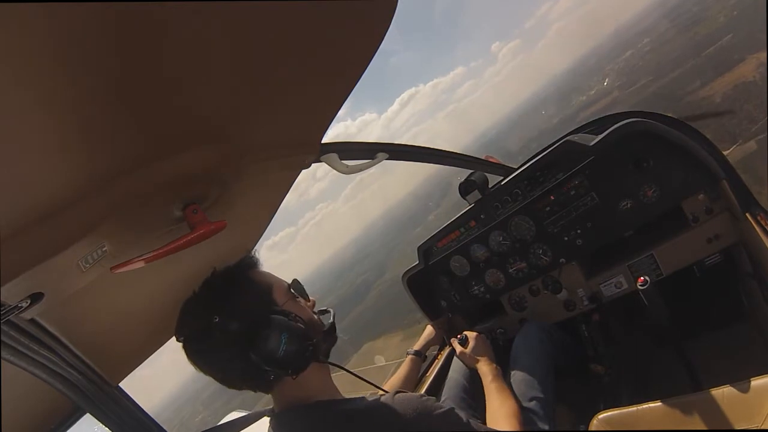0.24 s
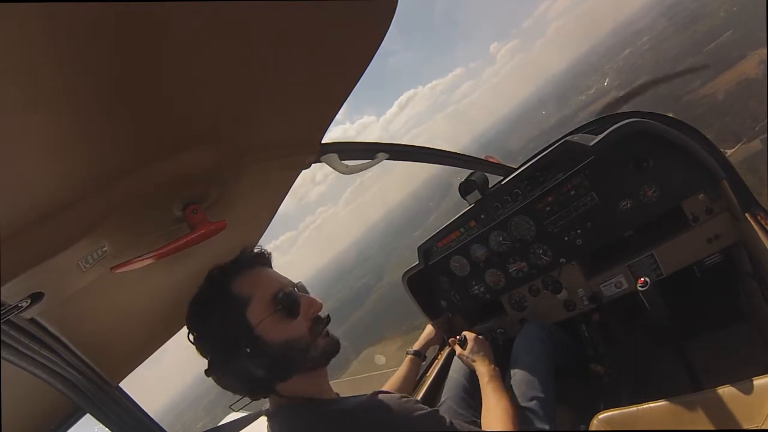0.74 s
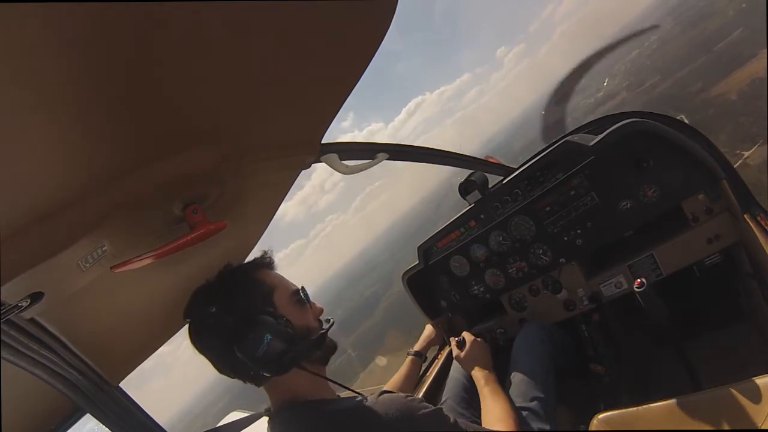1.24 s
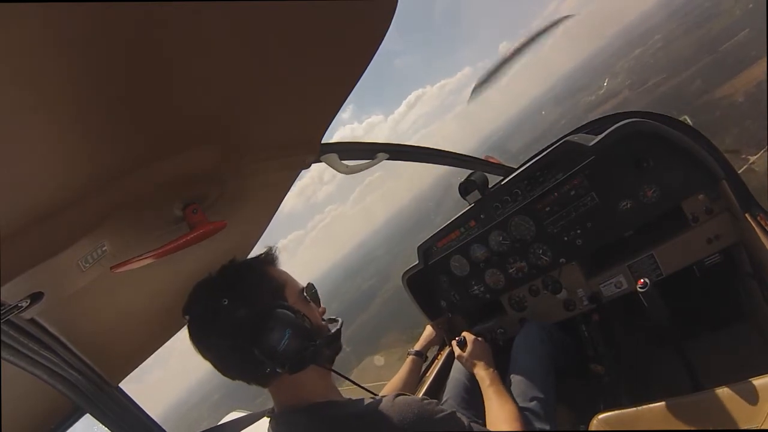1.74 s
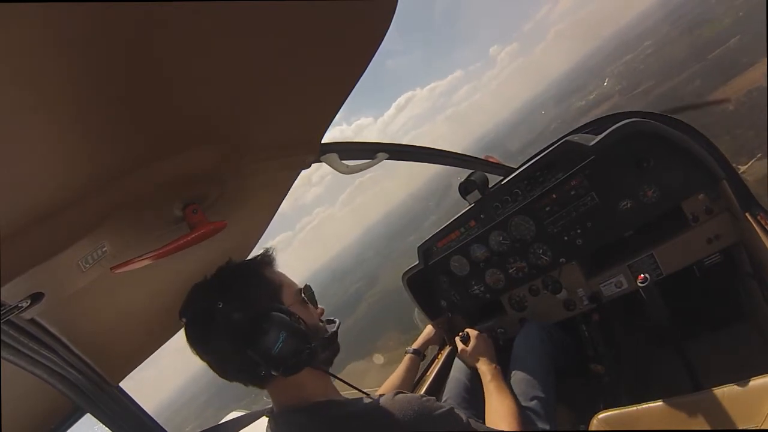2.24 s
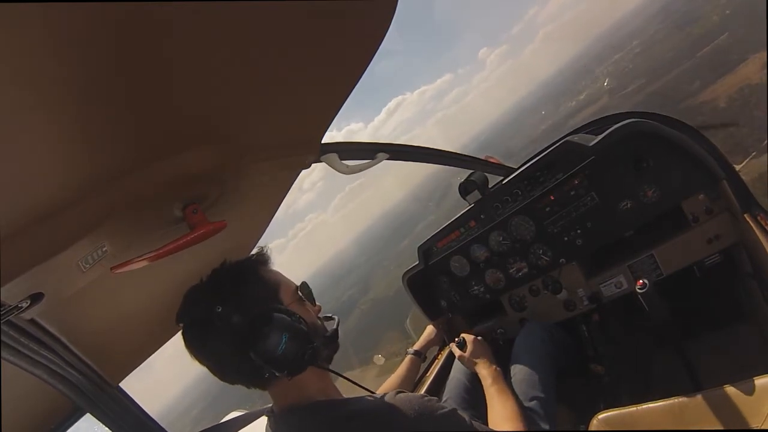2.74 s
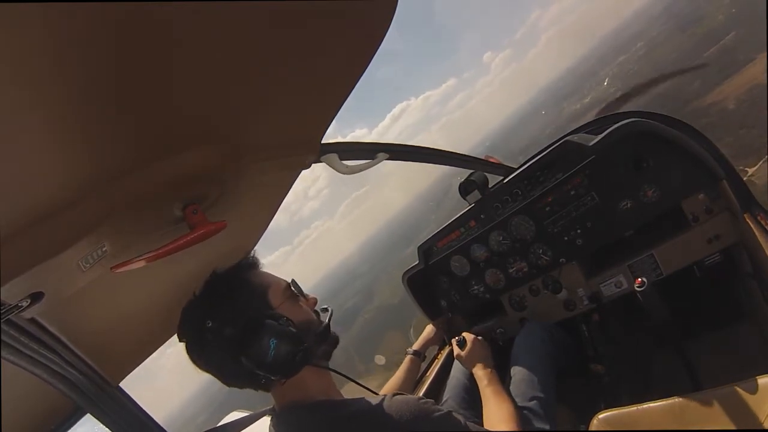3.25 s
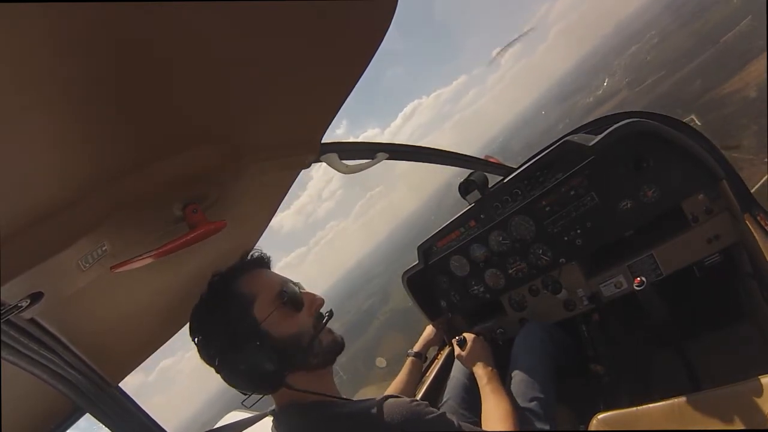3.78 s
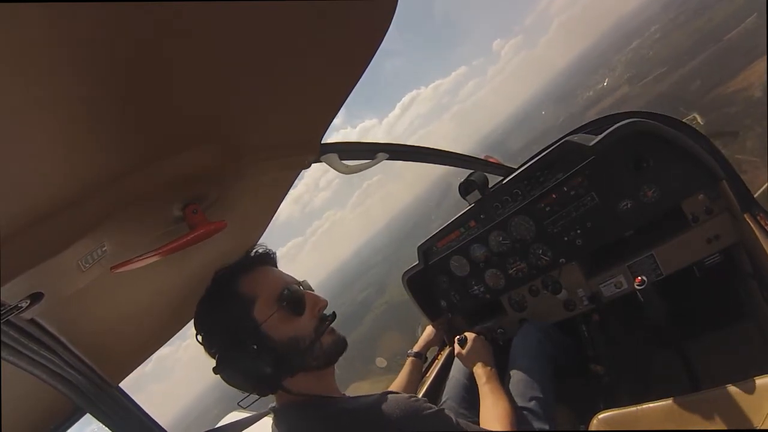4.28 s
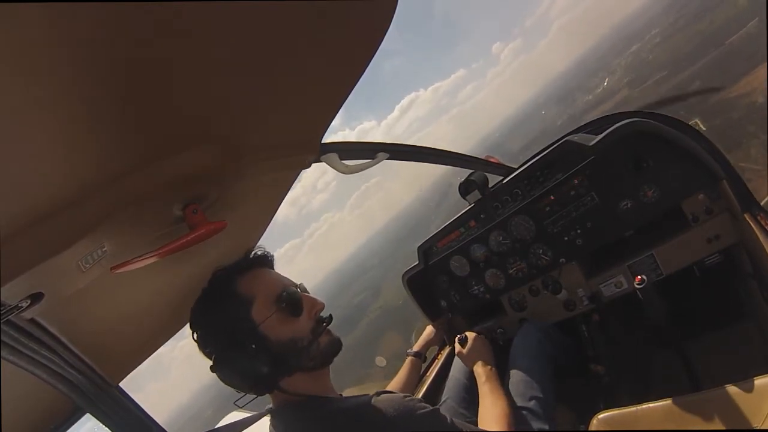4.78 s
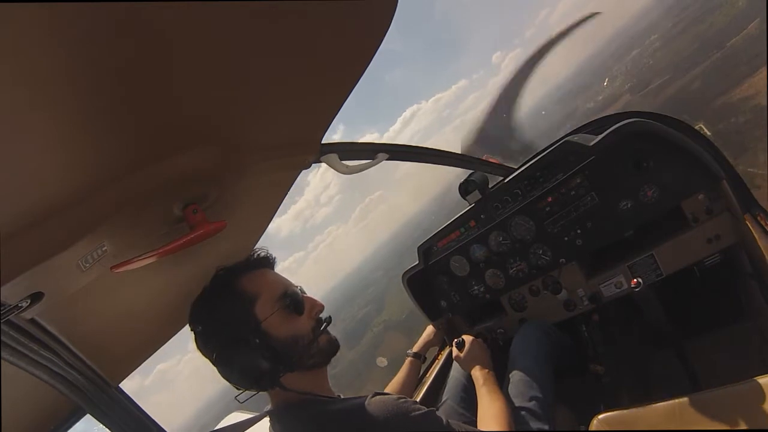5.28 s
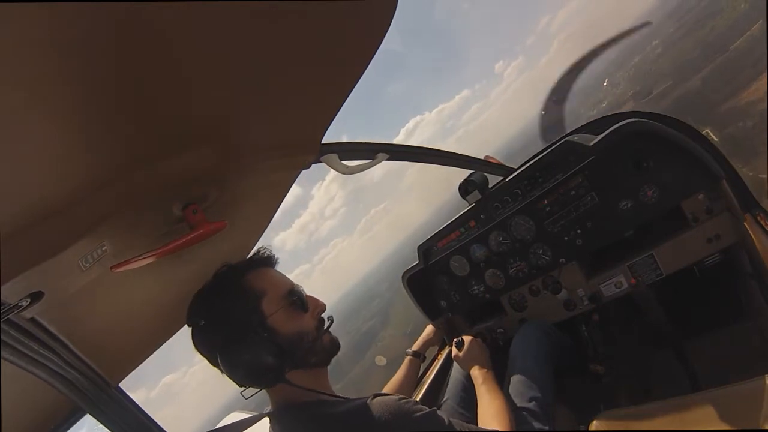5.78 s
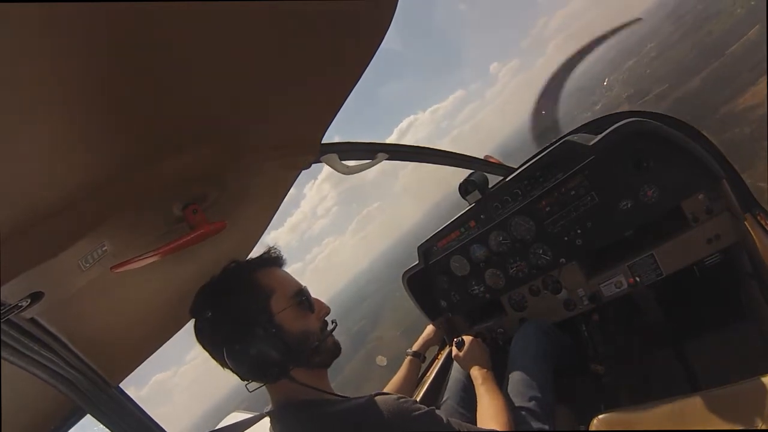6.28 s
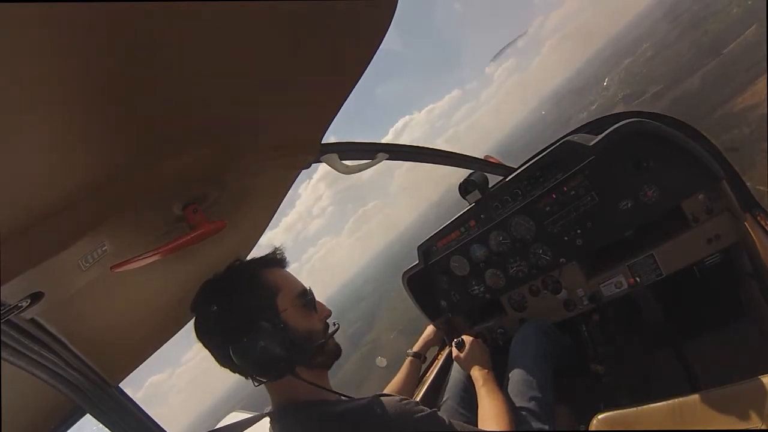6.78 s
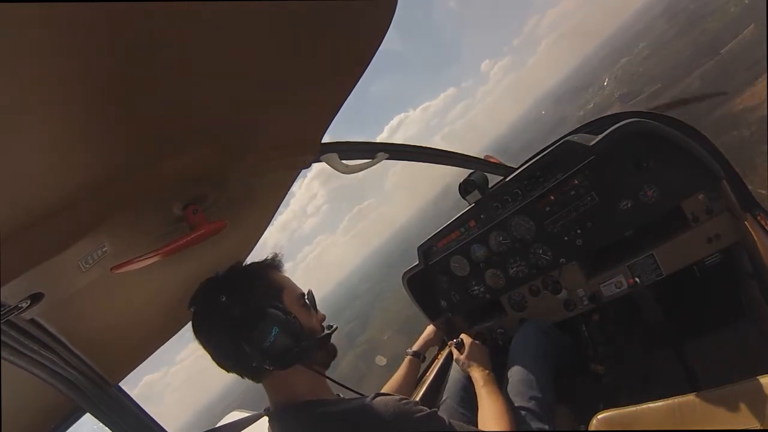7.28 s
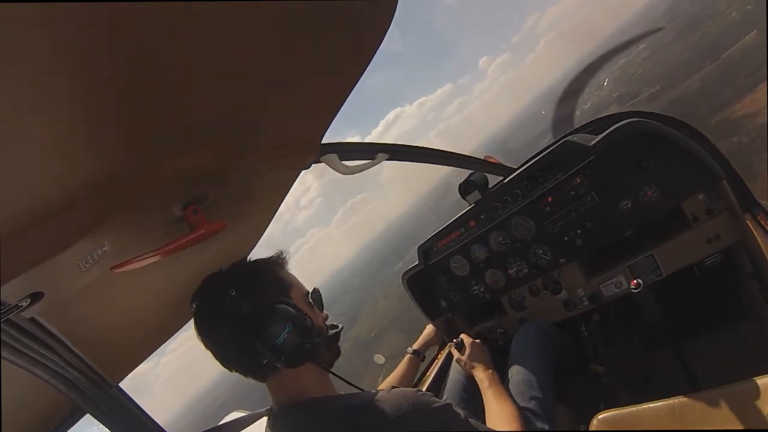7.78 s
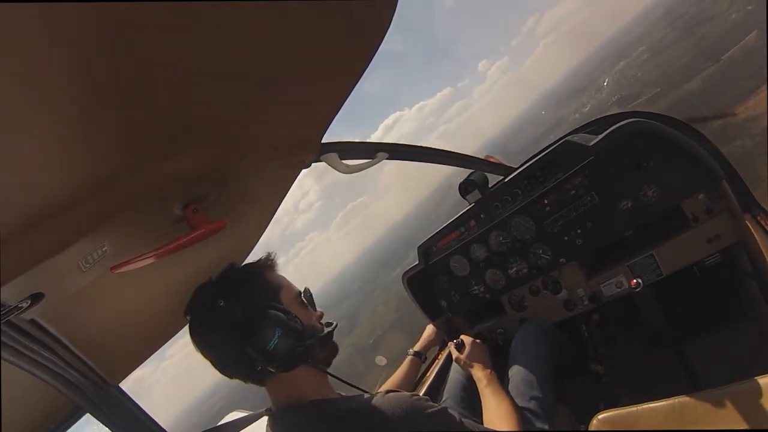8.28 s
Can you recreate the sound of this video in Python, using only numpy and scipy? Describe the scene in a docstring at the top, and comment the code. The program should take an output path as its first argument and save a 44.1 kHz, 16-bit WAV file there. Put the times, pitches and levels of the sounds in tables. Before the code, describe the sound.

Inside a light aircraft in flight, air throbs deeply and rushes over the canopy above a steady engine and propeller drone.

```python
"""A deep, uneven throb and a rush of air fill the cockpit of a light piston aircraft in a steady turn.
The throb is the slipstream (the air streaming past) beating on the cabin; the rush is air flowing over
the canopy (the clear roof). Engine and propeller drone on one pitch. Rough air makes the cabin rumble,
and gusts shake its panels and thump it. A loose fitting ticks in one gust; the electronics whine faintly.
"""
import sys
import numpy as np
from scipy import signal
from scipy.fft import rfft, irfft
from scipy.io import wavfile

SR = 44100
rng = np.random.default_rng(int(sys.argv[2]) if len(sys.argv) > 2 else 0)


def waveform_to_disk(signal):
    """Save audio, clipped to [-1, 1], as 16-bit WAV at the path in sys.argv[1]."""
    frames = np.transpose(np.atleast_2d(signal))
    scaled = np.clip(frames, -1, 1) * 32767
    samples = np.round(scaled).astype(np.int16)
    wavfile.write(sys.argv[1], SR, samples)


N = 376173
TIME = np.arange(N) / SR
FREQS_HZ = np.maximum(np.fft.rfftfreq(N, 1 / SR), 1)
BLADE_HZ = 100.71   # propeller blades passing per second

# The tones that shape one throb: multiple of the throb rate, relative level/dB
THROB_HARMONICS = [(1, 0), (2, -4), (3, -28), (4, -24.5)]
# Lulls, where the throb slows, weakens and stumbles: middle t/s, length/s, slowing/Hz
THROB_LULLS = [(0.02, 0.31, 4.2), (1.6, 0.38, 4.35), (3.25, .55, 4.6), (4.76, .3, 4.9), (5.38, 0.18, 2.5),
               (6.42, 0.335, 6.07), (7.1, .9, 2), (8.04, 0.46, 6)]
# How rough the air around the cabin is: t/s, relative level/dB
TURBULENCE_CURVE = [(0.0, -2), (0.3, -0.2), (1.0, 0), (1.7, -0.8), (2.3, 0.7), (2.9, 0.2), (3.95, -2.5),
                    (4.4, -1), (5.0, -1), (5.7, -0.1), (6.6, 0.0), (7.5, 1), (8.0, 0.4), (8.5, 1.5)]
# Gusts that shake the panels: middle t/s, length/s, rise/dB
PANEL_GUSTS = [(0.03, 0.63, 10), (2.24, 0.58, 5.5), (2.75, .16, 3.5)]
# The tone colour of air flowing over the canopy: f/Hz, relative level/dB
RUSH_SPECTRUM = [(400, -30.5), (750, -10.5), (950, -5.5), (1400, -2), (1900, 1), (2500, 0.5), (3000, -1.5),
                 (3600, -1.5), (4600, -6.5), (5300, -11), (7200, -18), (9000, -31.5), (12000, -45),
                 (15000, -65)]
# Cabin resonances (pitches it rings at) in the rush, plus two faint, steady engine gear whines
# at 2088 and 2330 Hz: f/Hz, width/Hz, boost/dB
RUSH_PEAKS = [(940, 40, 2.5), (1515, 55, 3.5), (1600, 30, 2), (2035, 50, 3), (2088, 12, 4), (2330, 18, 3.5),
              (2560, 45, 1.5), (2855, 40, 2), (4400, 200, 1), (4720, 70, 1.5)]
# The tone colour of the cabin's rumble: f/Hz, relative level/dB
RUMBLE_SPECTRUM = [(12, -19), (28, -6), (50, 10.5), (66, 8), (92, 2), (118, 3), (150, -0.5), (215, 1.5),
                   (260, -0.5), (310, -5), (360, -9), (400, -10.5), (440, -25.5), (600, -49)]
# The tones of engine and propeller: multiple of the blade rate, level/dB
DRONE_HARMONICS = [(1, -41), (2, -48), (5, -63), (6, -67.5), (7, -73), (8, -63.5)]
# Gusts hitting the airframe: t/s, strike level/dB
THUMP_HITS = [(.231, -22), (.347, -23), (.760, -28), (.946, -22), (1.831, -17), (2.675, -13), (2.762, -8.5),
              (4.808, -16), (5.118, -20), (6.622, -17), (7.562, -23), (8.385, -28), (8.505, -26)]
# The pitches at which the panels ring: f/Hz, width/Hz, relative level/dB
PANEL_RESONANCES = [(417, 92, -4), (520, 110, -2), (607, 32, -0.5), (695, 22, 1), (850, 180, -4.5)]
# Taps of the loose fitting: t/s, strike level/dB
FITTING_TAPS = [(2.676, -34), (2.684, -23), (2.7162, -9), (2.719, -23), (2.736, -13), (2.750, -20),
                (2.7565, -11), (2.768, -34), (2.786, -18)]
# Steady tones of the electronics: f/Hz, level/dB
WHINE_TONES = [(11408, -64.5), (12500, -72.5)]


def slipstream_throb(turbulence_db, even_hz=42.7, level_db=-27.0, jitter_hz=20):
    """Each swirl of air pulls one rounded dip in pressure; the slower they come, the more they stumble."""
    slowing_hz = swells(THROB_LULLS)
    rate_hz = even_hz - slowing_hz + 0.815 * drift(4)
    stumble = (0.032 + 0.0054 * slowing_hz) * drift(jitter_hz)
    cycles = np.cumsum(rate_hz) / SR + stumble
    dips = -sum(from_db(db) * np.cos(2 * np.pi * round(multiple) * cycles)
                for multiple, db in THROB_HARMONICS)
    throb_db = level_db + 0.94 * turbulence_db - 0.05 * slowing_hz + 0.7 * drift(jitter_hz)
    return np.sqrt(2) * from_db(throb_db) * dips


def canopy_rush(turbulence_db, swell_db=0.3, swell_hz=3.1):
    """Air rushes over the canopy. Its low part swells in gusts, and rougher air makes it hiss more."""
    boost_db = sum(db * hump(hz, width) for hz, width, db in RUSH_PEAKS)   # resonances and gear whines
    air = cabin_echoes(noise(from_db(spectrum_db(RUSH_SPECTRUM) + boost_db)))
    air = air * from_db(0.16 * drift(12))   # a slight flicker
    # Split the sound into four bands, from low to high, each with its own gain.
    low, up_to_mid, up_to_high = below(air, 1400), below(air, 3600), below(air, 8500)
    low_db = -31.0 + 0.17 * swells(PANEL_GUSTS) + swell_db * drift(swell_hz)
    mid_db = -31.5 - 0.12 * turbulence_db
    high_db = -31.5 + 0.23 * turbulence_db + swell_db * drift(swell_hz)
    hiss_db = -27.5 + 0.97 * turbulence_db
    return (from_db(low_db) * low
            + from_db(mid_db) * (up_to_mid - low)
            + from_db(high_db) * (up_to_high - up_to_mid)
            + from_db(hiss_db) * (air - up_to_high))


def cabin_rumble(turbulence_db, level_db=-33.5):
    """Rough air booms in the cabin as a deep noise."""
    return from_db(level_db + turbulence_db) * noise(from_db(spectrum_db(RUMBLE_SPECTRUM)))


def propeller_growl(turbulence_db, level_db=-37.5, wander_hz=48):
    """A strong tone at three times the blade rate slips ahead and behind so quickly that it growls."""
    cycles = 3 * BLADE_HZ * TIME + 0.15 * drift(wander_hz)
    tone = below(np.sin(2 * np.pi * cycles), 396, steepness=12)
    flutter_db = drift(wander_hz)
    return np.sqrt(2) * from_db(level_db + turbulence_db + flutter_db) * tone


def engine_drone(flutter_db=1.2, flutter_hz=5):
    """Engine and propeller make clean tones at multiples of the blade rate, fluttering in the rough air."""
    cycles = BLADE_HZ * TIME + 0.017 * drift(6.4)
    drone = np.zeros(N)
    for multiple, db in DRONE_HARMONICS:
        tone = np.sin(2 * np.pi * (round(multiple) * cycles + rng.random()))
        drone += np.sqrt(2) * from_db(db + flutter_db * drift(flutter_hz)) * tone
    return drone


def gust_thumps(boom_hz=74):
    """A gust sets the cabin air swinging for a cycle or two."""
    swing = ring(clicks(THUMP_HITS), boom_hz, fade_s=0.08)
    return signal.sosfilt(signal.butter(2, 400, fs=SR, output="sos"), swing)


def shaking_panels(turbulence_db, level_db=-50.0):
    """The panels shake in the rough air, and much harder in a gust."""
    power = sum(from_db(db) ** 2 * hump(hz, width) for hz, width, db in PANEL_RESONANCES)
    shake_db = level_db + turbulence_db + swells(PANEL_GUSTS) + 0.4 * drift(3)
    return from_db(shake_db) * noise(np.sqrt(power) / (1 + (FREQS_HZ / 1500) ** 4))


def fitting_ticks(ring_s=0.007, ping_hz=1150, chatter_s=0.012, chatter_top_hz=6000):
    """Each hard tap of a loose fitting is a sharp click that knocks the panels, pings and chatters."""
    taps = clicks(FITTING_TAPS)
    spikes = signal.sosfilt(signal.butter(1, 5000, fs=SR, output="sos"), taps)
    knocks = sum(from_db(db) * ring(taps, hz, ring_s) for hz, _, db in PANEL_RESONANCES)
    ping = ring(taps, ping_hz, ring_s)
    fading = signal.lfilter([1], [1, -from_db(-60 / (chatter_s * SR))], taps + 1e-18)
    chatter = fading * noise(1 / np.sqrt(1 + (FREQS_HZ / chatter_top_hz) ** 2))
    return from_db(1.5) * spikes + from_db(-23) * knocks + from_db(-19) * ping + from_db(-28) * chatter


def electronics_whine(turbulence_db, buzz_db=-69, buzz_hz=9960, swing_hz=500):
    """Two steady tones, and a faint third that sweeps 30 times a second and swells in rough air."""
    steady = sum(from_db(db) * np.sin(2 * np.pi * hz * TIME) for hz, db in WHINE_TONES)
    sweep = np.sin(2 * np.pi * 30 * TIME)
    cycles = np.cumsum(buzz_hz + swing_hz * sweep) / SR
    buzz = (1 - 0.25 * sweep) * np.sin(2 * np.pi * cycles)
    return np.sqrt(2) * (steady + from_db(turbulence_db + buzz_db) * buzz)


def cabin_echoes(sound, share=0.23, shift_hz=1.43, longest_s=0.016, count=14):
    """Quick echoes off glass and panels come and go, so the tone colour keeps shifting a little."""
    delays = (rng.uniform(0.001, longest_s, count) * SR).astype(int)
    echoes = sum(drift(shift_hz) * np.roll(sound, delay) for delay in delays)
    return rms_one(sound + share * echoes / np.sqrt(count))


def from_db(db):
    """Turn decibels into a number to multiply a sound by."""
    return 10 ** (np.asarray(db) / 20)


def rms_one(sound):
    """Scale a sound so that its typical size (root mean square) is 1."""
    return sound / np.sqrt(np.mean(sound ** 2) + 1e-20)


def spectrum_db(points):
    """Join (frequency, level) points into a curve over all frequencies."""
    hz, db = np.transpose(points)
    return np.interp(np.log(FREQS_HZ), np.log(hz), db)


def hump(hz, width_hz):
    """A bell-shaped curve around one frequency, 1 at its top."""
    return 1 / (1 + (2 * (FREQS_HZ - hz) / width_hz) ** 2)


def noise(gain):
    """Steady noise of typical size 1, shaped by a gain for each frequency."""
    return rms_one(irfft(rfft(rng.standard_normal(N)) * gain, N))


def drift(rate_hz, points=9000):
    """A smooth random wobble of typical size 1, no faster than about the given rate."""
    hz = np.fft.rfftfreq(points, N / SR / points)
    slow = irfft(rfft(rng.standard_normal(points)) / (1 + (hz / rate_hz) ** 4), points)
    return np.interp(np.linspace(0, points - 1, N), np.arange(points), rms_one(slow))


def swells(rows):
    """One smooth rise and fall for each (middle time, length, height) row."""
    return sum(height * np.cos(np.pi * np.clip((TIME - middle) / length, -0.5, 0.5)) ** 2
               for middle, length, height in rows)


def clicks(rows):
    """A one-sample click for each (time, level) row."""
    track = np.zeros(N)
    for t, db in rows:
        track[min(round(t * SR), N - 1)] += from_db(db)
    return track


def ring(strikes, hz, fade_s):
    """Each strike starts a pure tone that dies away by 60 dB in fade_s seconds."""
    decay = from_db(-60 / (fade_s * SR))
    angle = 2 * np.pi * hz / SR
    return signal.lfilter([0, np.sin(angle)], [1, -2 * decay * np.cos(angle), decay ** 2], strikes + 1e-18)


def below(sound, hz, steepness=8):
    """Keep the part of a sound that lies under a frequency."""
    return irfft(rfft(sound) / (1 + (FREQS_HZ / hz) ** steepness), N)


def scene(leak_hz=29):
    """All the sounds meet at one spot behind the pilot, the same in both channels."""
    times, levels_db = np.transpose(TURBULENCE_CURVE)
    turbulence_db = np.interp(TIME, times, levels_db)
    buffeting = slipstream_throb(turbulence_db) + gust_thumps()
    buffeting -= below(buffeting, leak_hz, steepness=12)   # the slowest pressure swings leak away
    engine = engine_drone() + propeller_growl(turbulence_db)
    airflow = cabin_rumble(turbulence_db) + shaking_panels(turbulence_db) + canopy_rush(turbulence_db)
    cabin = buffeting + engine + airflow + fitting_ticks() + electronics_whine(turbulence_db)
    return np.stack([cabin, cabin])


def record(dry, cutoff_hz=15200):
    """Cut off the very highest treble steeply."""
    return signal.sosfilt(signal.ellip(10, 0.1, 80, cutoff_hz, fs=SR, output="sos"), dry)


dry = scene()
out = record(dry)
waveform_to_disk(out)
```